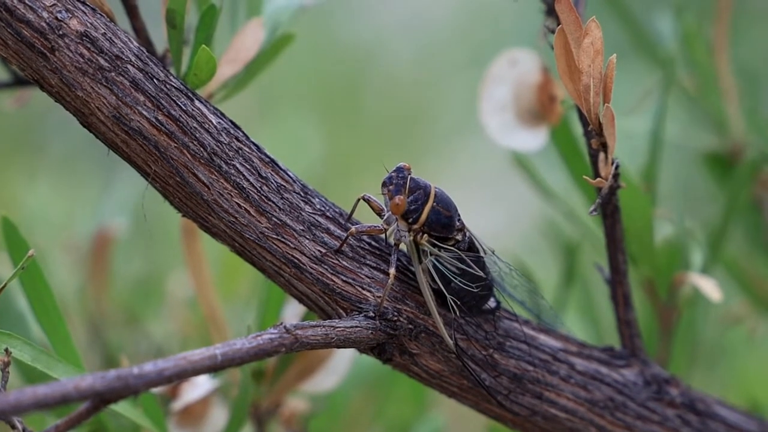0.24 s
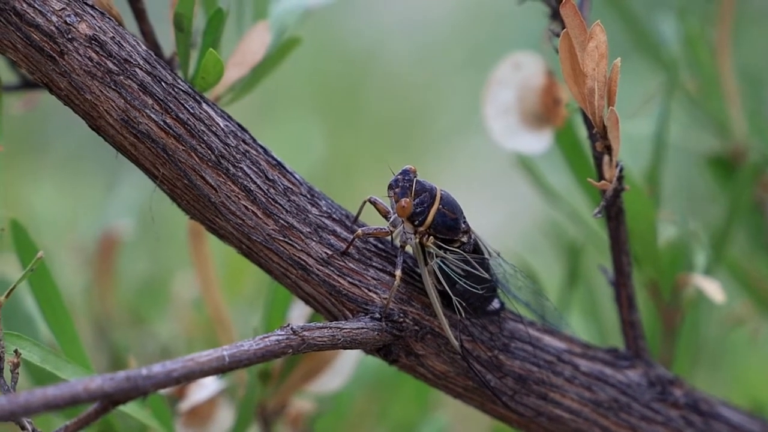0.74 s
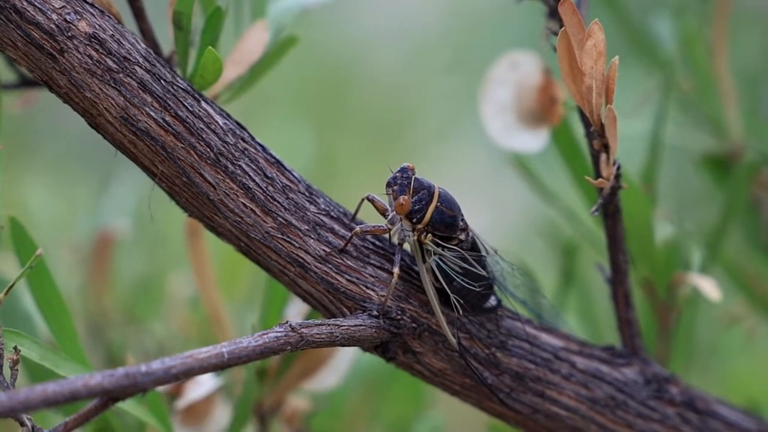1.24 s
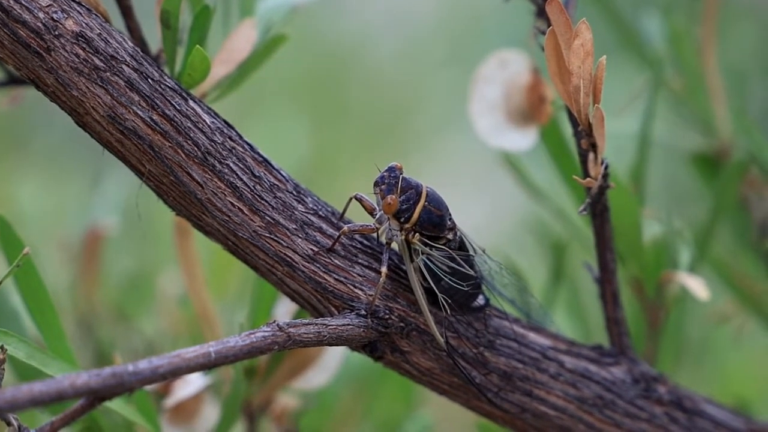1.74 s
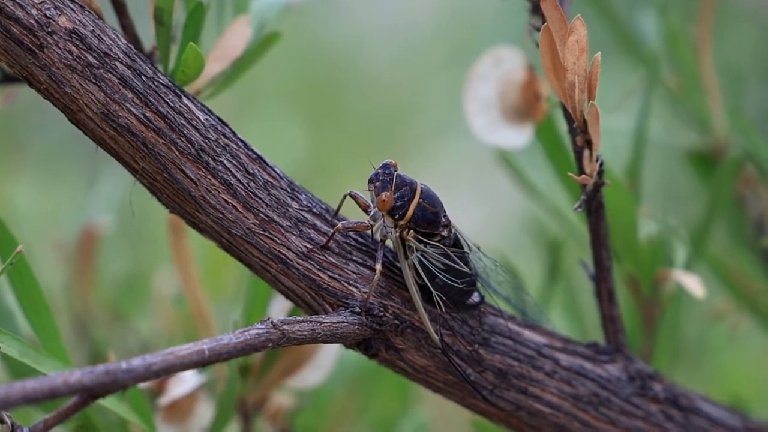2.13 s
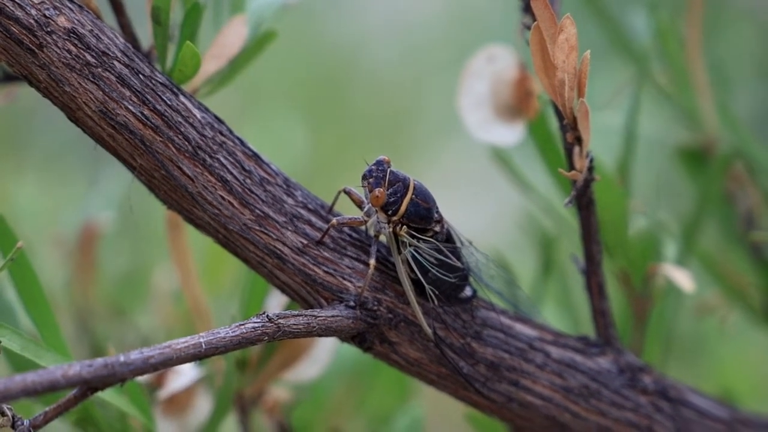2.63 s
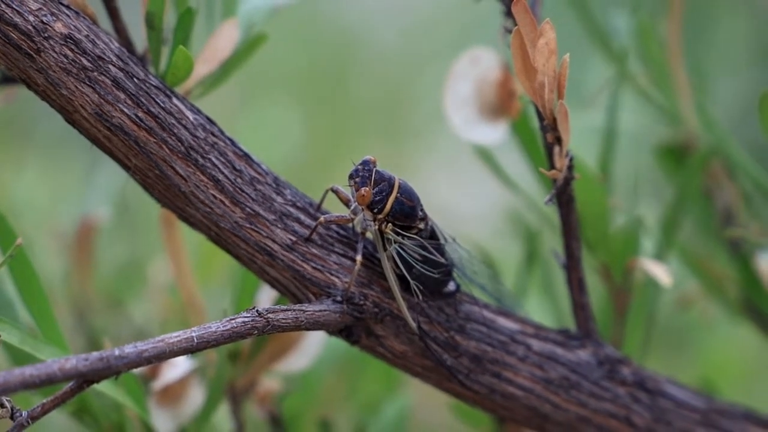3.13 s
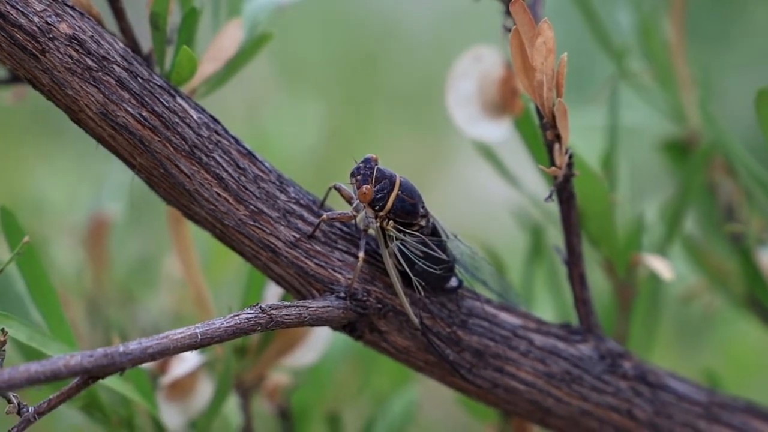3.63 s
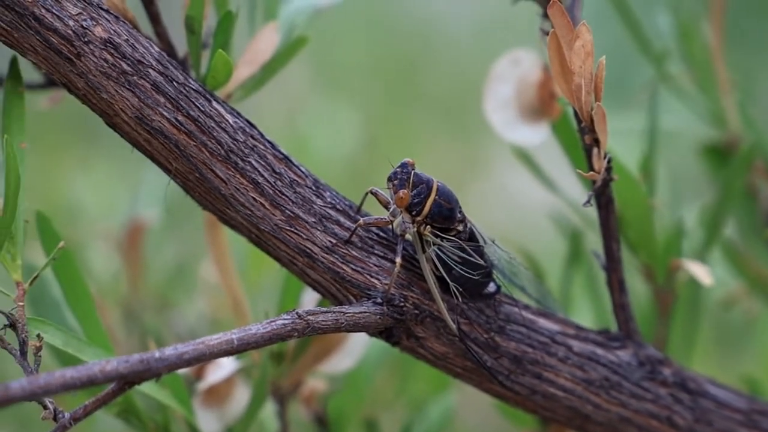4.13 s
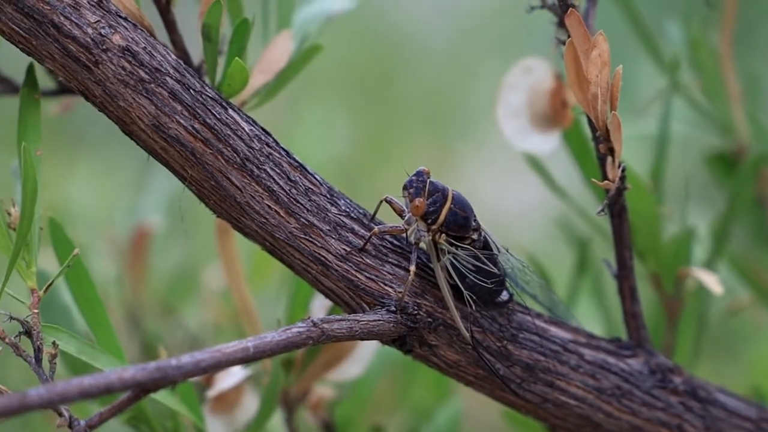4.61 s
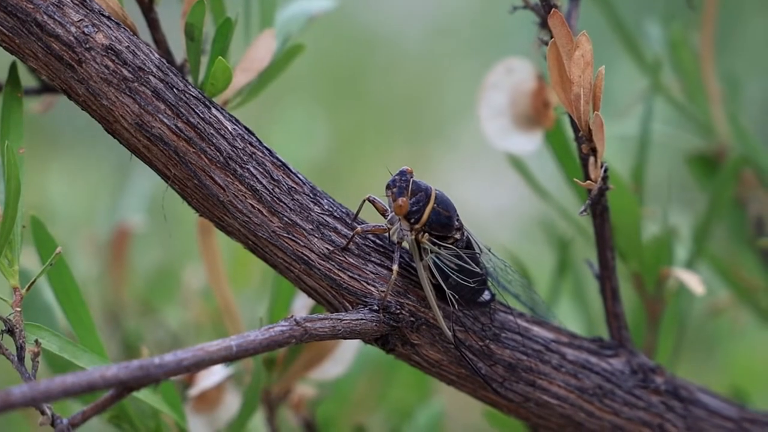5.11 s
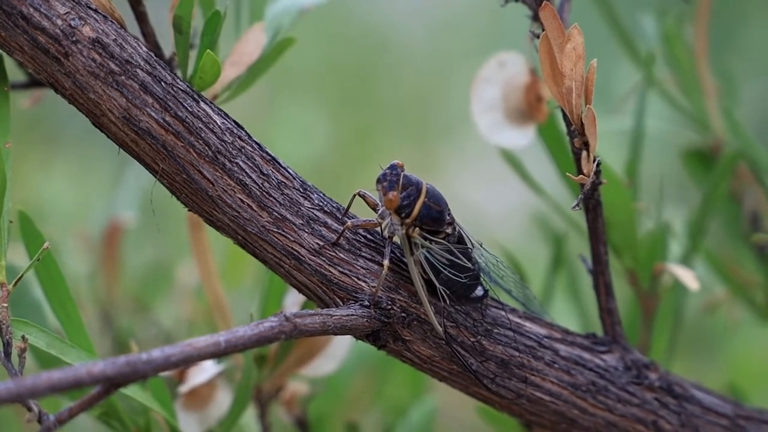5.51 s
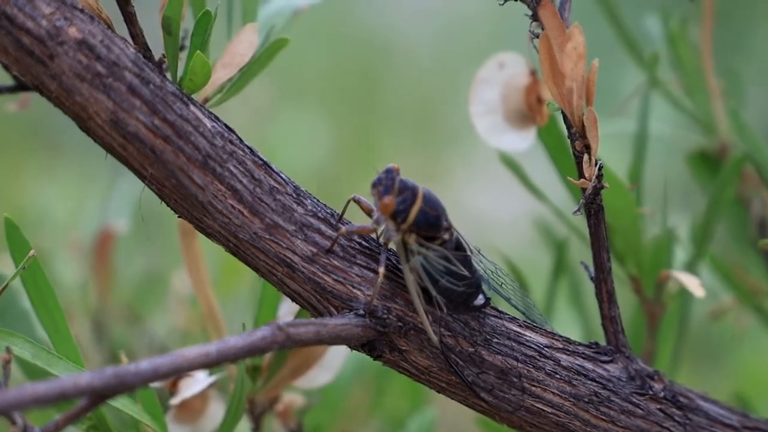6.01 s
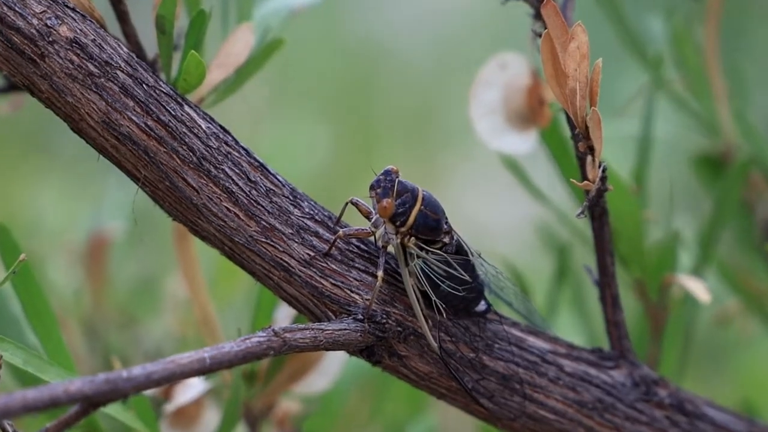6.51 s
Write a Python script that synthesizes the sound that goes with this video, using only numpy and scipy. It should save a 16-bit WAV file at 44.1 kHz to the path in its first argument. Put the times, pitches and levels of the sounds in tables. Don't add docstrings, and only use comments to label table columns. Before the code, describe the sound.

Close stereo pickup of two cicadas on leafy twigs. One holds a bright, shrill, steady buzz while the other ticks faintly underneath, faster and faster. The first breaks off, leaving a quiet dry rattle that turns into a buzz, tightening and swelling until it is loud at the end. A faint distant chorus and soft air lie behind.

```python
import sys
import numpy as np
from scipy import signal
from scipy.fft import rfft, irfft, next_fast_len
from scipy.io import wavfile
from scipy.ndimage import uniform_filter1d

SR = 44100
rng = np.random.default_rng(int(sys.argv[2]) if len(sys.argv) > 2 else 0)


def generate_wav(signal):
    frames = np.transpose(np.atleast_2d(signal))
    scaled = np.clip(frames, -1, 1) * 32767
    pcm = np.round(scaled).astype(np.int16)
    wavfile.write(sys.argv[1], SR, pcm)


def nominal_scale(level):
    x = np.asarray(level, float) / 20
    return 10 ** x


N = 297675

# pitch in Hz, width in Hz, left level in dB,
# right level in dB, lag of the left behind the right in ms.
SLACK_MODES = [(3180, 1400, -26.5, -30.5, 0.048), (5250, 170, -31, -8.5, 0.28), (6400, 950, -8, -7, 0.022),
               (6880, 2100, -4, 5, 0.024), (7730, 1420, 3, 3, 0.034), (9640, 430, -8.5, -9, 0.049),
               (12500, 730, -27, -11.5, 0.033), (15000, 820, -18, -26, 0.24)]
STEADY_DB = .6


def first_cicada():
    # time in seconds, strokes per second.
    stroke_rate = [(.0041, 157.42), (1, 157.49), (2.2, 157.16), (3.4, 157.39), (3.75, 157.21),
                   (3.95, 156.33), (4.42, 156.53), (4.6, 149.27)]
    # start in seconds, level in dB.
    last_strokes = [
        (4.6397, -30),
        (4.7314, -40),
        (4.8654, -42),
    ]
    # time in seconds, level of each of the four ribs in dB.
    rib_strength = [(0, -20, -14, -14, -26), (1.05, -20, -14, -16, -26), (1.3, -14, -20, -21, -24),
                    (3.1, -14, -19, -21, -24), (3.5, -15, -20, -14, -19), (4.6, -15, -20, -13, -19)]
    rib_wait_ms = [.85, 1.05, 1.35, 1.65]
    # delay in ms, level in dB.
    twig_echoes = [(2.1, -24), (3.0, -20), (3.4, -23), (4.1, -27), (5.55, -21)]
    # time in seconds, left minus right in dB.
    sway = [(0, 1), (2, 4.1), (3.6, 1.5), (4.1, 0.5), (4.55, 2.5), (4.6, 0)]
    steady_level_db, falter_db, falter_s = -27, -6, 4.551

    s = stroke_times(stroke_rate, jitter_ms=.027)
    level_db = steady_level_db + falter_db * (s > falter_s)
    level_db = level_db + rng.normal(0, STEADY_DB / 2, len(s))
    last_s, last_db = np.transpose(last_strokes)
    s, level_db = np.append(s, last_s), np.append(level_db, last_db)

    lead = body(first_body(s), s, nominal_scale(level_db), uneven_db=STEADY_DB)
    lead = with_echoes(lead, twig_echoes)

    rib_db = np.transpose(read(rib_strength, s))
    unsteady_ms = rng.normal(0, .025, rib_db.shape)
    rib_s = (s[:, None] + (rib_wait_ms + unsteady_ms) / 1000).ravel()
    rib_sizes = nominal_scale(level_db[:, None] + rib_db).ravel()
    rest = body(first_body(rib_s), rib_s, rib_sizes, uneven_db=1.8)

    pan_db = read(sway, np.arange(N) / SR)[0]
    song = nominal_scale(13.5) * (lead + rest) * nominal_scale([pan_db / 2, -pan_db / 2])
    return song, nominal_scale(-13.0) * push(s, nominal_scale(level_db), cut_hz=2330)


def first_body(s):
    # pitch in Hz, width in Hz, left level in dB, right level in dB, left lag in ms.
    first_modes = [(4640, 1860, -27.5, -19, 0.019), (7040, 230, -15.5, -3, -0.1),
                   (8643, 105, 1, -24, -0.037), (9104, 420, 1, 3.5, -0.033), (9910, 820, -28, 0.5, -0.056),
                   (10465, 112, -1, -3, 0.014), (10810, 370, -19, -2, -0.037),
                   (11940, 240, -16, -18, -0.14), (13930, 1500, -25, -20, 0.11)]
    climb_per_s, middle_s = .008, 2.3
    modes = np.repeat(np.array(first_modes)[..., None], len(s), axis=2)
    climbs = (modes[:, 0] > 10200) & (modes[:, 0] < 13000)
    modes[:, 0] *= 1 + climbs * climb_per_s * (s - middle_s)
    return modes


def second_cicada():
    # time in seconds, strokes per second.
    stroke_rate = [(4.6158, 143.31), (5, 149.69), (5.5, 152.56), (6.2, 156.74), (6.75, 156.41)]
    # time in seconds, first click in dB, body tension from 0 to 1.
    song_curve = [(4.63, -41, 0), (4.9, -39.5, 0), (5.33, -35.5, 0.13), (5.5, -33.5, 0.08),
                  (5.7, -31.5, 0.22), (5.85, -29.5, 0.63), (6.02, -27, 0.69), (6.06, -23.5, 0.73),
                  (6.6, -22.5, 0.95)]
    # start in seconds, other drum's delay in ms, other drum's level
    # in dB, swing of the first click above and below its mean in dB.
    gaits = np.array([
        (4.6, .72, -1, 0),
        (5.12, .83, -1.5, 0),
        (5.345, .3, -3, 0),
        (5.48, .3, -16, .2),
        (5.862, .365, -13, 2),
        (6.34, .45, -18, .2),
    ])
    # time in seconds, delay of each of the four ribs in ms.
    rib_delays = [(4.62, 2.25, 3.0, 3.55, 3.9), (5, 1.85, 2.7, 3.3, 3.65), (5.25, 1.7, 2.48, 3.2, 3.5),
                  (5.5, 1.45, 2.1, 2.68, 3.02), (5.8, 1.1, 1.66, 2.14, 2.6), (6.1, .9, 1.32, 1.81, 2.3),
                  (6.4, .8, 1.02, 1.68, 2.1), (6.75, .8, .98, 1.68, 2.16)]
    # time in seconds, level of each rib in dB.
    rib_levels = [(4.62, -2, -3, -4, -9), (5.3, -3, -4, -4, -9), (5.6, -5, -5, -5, -11),
                  (5.85, -4, -5, -5, -13), (5.87, -24, -5, -5, -13), (6.3, -26, -6, -6, -13),
                  (6.42, -28, -5, -5, -11), (6.75, -28, -6, -7, -10)]
    shove_levels = [0, -3, -3, -3, -3, -3]
    # pitch in Hz, width in Hz, left level in dB, right level in dB,
    # left lag in ms.
    taut_modes = [(5110, 190, -20.5, -15, 0.045), (6760, 220, -19, -8, 0.018),
                  (7150, 330, -24.5, -23, 0.0061), (8340, 740, 10, 9, 0.028), (9200, 170, -4.5, 1, 0.05),
                  (10290, 100, -32, -9, 0.03), (13030, 980, -31, -17, 0.1), (15260, 690, -28, -25, 0.033)]
    # delay in ms, level in dB.
    twig_echoes = [(.45, -19), (2.9, -27), (4.6, -30)]

    s = stroke_times(stroke_rate, jitter_ms=.023)
    level_db, taut = read(song_curve, s)
    since, other_ms, other_db, swing_db = gaits[np.searchsorted(gaits[:, 0], s) - 1].T
    alternate = (-1.) ** np.arange(1, len(s) + 1)
    swing = swing_db * np.exp(-((s - since) / .33) ** 2) * alternate

    delay_ms = np.column_stack([0 * s, other_ms, *read(rib_delays, s)])
    wobble_ms = np.interp(taut, [0, 1], [.028, .012])
    delay_ms[:, 1:] += rng.normal(0, 1, (len(s), 5)) * wobble_ms[:, None]
    snap_s = (s[:, None] + delay_ms / 1000).ravel()

    rib_db = np.transpose(read(rib_levels, s)) - swing[:, None]
    db = level_db[:, None] + np.column_stack([swing, other_db + 6.5 * swing, rib_db])
    db = db + rng.normal(0, STEADY_DB / 2, delay_ms.shape)

    taut = np.repeat(np.clip(taut, 0, 1), delay_ms.shape[1])
    modes = np.array(SLACK_MODES)[..., None] * (1 - taut) + np.array(taut_modes)[..., None] * taut
    taut_rib = taut ** 2 * np.tile([0, 0, 1, 1, 1, 1], len(s))
    modes[3, 2:4] += -4 * taut_rib
    modes[:, 1] *= 1 + 1.5 * taut_rib
    song = body(modes, snap_s, nominal_scale(db).ravel(), uneven_db=STEADY_DB)

    shove_db = db + 0.75 * level_db[:, None] + shove_levels
    shove = push(snap_s, nominal_scale(shove_db).ravel(), cut_hz=2370)
    return nominal_scale(16.0) * with_echoes(song, twig_echoes), nominal_scale(9.5) * shove


def ticks():
    slow_ticks = [.1067, .229, .362, .49, .6227, .7427, .86, .9686, 1.081, 1.1933, 1.352, 1.448, 1.575,
                  1.6888, 1.8188, 1.9415, 2.0582, 2.1537, 2.249, 2.357, 2.4588, 2.5745, 2.6948, 2.798,
                  2.8963, 2.9946, 3.076, 3.158, 3.2477, 3.3296]
    quick_ticks = [3.4127, 3.489, 3.584, 3.6616, 3.7123, 3.7328, 3.7831, 3.8027, 3.846, 3.8725, 3.8927,
                   3.9268, 3.9504, 3.977, 3.999, 4.0391, 4.07, 4.086, 4.107, 4.1244, 4.1435]
    # time in seconds, ticks per second.
    roll_rate = [(4.169, 46), (4.45, 50), (4.55, 72), (4.604, 72)]
    rib_shares = [.48, .69, .89, 1.]
    tick_db, sag_db_per_s, hurried_db, roll_db = -36, -0.95, -41, -40.5
    hurry_s, answer_from_s, answer_always_s = 3.7, 3.75, 4.5
    answer_ms, answer_db = 7.5, -2
    lag_ms, spread_ms = .9, 4.6

    roll = stroke_times(roll_rate, jitter_ms=2.5)
    s = np.concatenate([slow_ticks, quick_ticks, roll])
    db = np.select([s < hurry_s, s < roll[0]], [tick_db + sag_db_per_s * s, hurried_db], roll_db)
    answered = rng.random(len(s)) < (s - answer_from_s) / (answer_always_s - answer_from_s)
    s, db = np.append(s, s[answered] + answer_ms / 1000), np.append(db, db[answered] + answer_db)
    db = db + STEADY_DB * rng.normal(0, 1, len(s))

    chance = rng.normal(0, 1, (len(s), 10))
    delay_ms = lag_ms + spread_ms * np.array([0, .15] + rib_shares[:3]) + 0.27 * chance[:, :5]
    sizes = nominal_scale(db[:, None] + np.array([-0.5, 3, -7.0, -2.5, -1.5]) + 0.17 * chance[:, 5:])
    snap_s = (s[:, None] + delay_ms / 1000).ravel()
    sound = body(SLACK_MODES, snap_s, sizes.ravel(), uneven_db=3.0)
    return nominal_scale(13.5) * passed(sound, 2, 8000)


def body(modes, s, sizes, uneven_db):
    rise_ms, length = 0.39, 140
    out = np.zeros((2, N + length))
    at = np.clip(np.ceil(s * SR) - 4, 0, N).astype(int)[:, None] + np.arange(length)
    t = np.maximum((at + 4) / SR - s[:, None], 0)
    rise = np.sin(np.pi / 2 * np.minimum(1000 * t / rise_ms, 1)) ** 2
    for hz, width, left_db, right_db, lag_ms in np.reshape(modes, (len(modes), 5, -1, 1)):
        force = sizes * nominal_scale(rng.normal(0, uneven_db, len(s)))
        ring = force[:, None] * width / 1000 * rise * np.exp(-np.pi * width * t)
        for side, (db, lag) in enumerate([(left_db, lag_ms), (right_db, -lag_ms)]):
            wave = nominal_scale(db) * ring * np.sin(2 * np.pi * hz * (t - lag / 2000))
            out[side] += np.bincount(at.ravel(), wave.ravel(), N + length)
    return out[:, :N]


def push(s, sizes, cut_hz):
    return passed(clicks(s, sizes), 2, cut_hz)


def with_echoes(x, echoes):
    ms, db = np.transpose(echoes)
    taps = clicks(np.append(0, ms) / 1000 + 6 / SR, nominal_scale(np.append(0, db)))[:300]
    return signal.fftconvolve(x, taps[None], axes=1)[:, 6:N + 6]


def leaves(x):
    t = np.arange(int(.12 * SR)) / SR
    fade = nominal_scale(-60 * t / .045) * np.minimum(t / 0.0035, 1)
    scatter = rng.standard_normal((2, len(t))) * fade
    scatter = scatter / np.linalg.norm(scatter, axis=1, keepdims=True)
    return nominal_scale(-21.5) * signal.fftconvolve(x, scatter, axes=1)[:, :N]


def far_sounds():
    # pitch in Hz, level in dB per Hz.
    chorus_colour = [(3000, -36.5), (4500, -25), (6000, -13.5), (8000, 1.5), (9500, -6), (11000, -10),
                     (13000, -17), (16000, -23.5)]
    # time in seconds, level in dB.
    drone_passes = [
        (.63, -70),
        (1.65, -63.5),
        (3.2, -66.5),
        (4.45, -62.5),
        (4.8, -67),
    ]
    rise_db_per_s, fall_db_per_s = 20.5, 19
    call_s, call_length_s, call_db, call_hz, lift_hz = 5.115, 0.096, -75, 584, 119

    t = np.arange(N) / SR
    near_db = [db - np.where(t < s, rise_db_per_s * (s - t), fall_db_per_s * (t - s)) for s, db in drone_passes]
    drone_colour = [(150, -33), (260, -13.0), (330, -9.5), (420, -19.0), (600, -34.5)]
    drone = noise(drone_colour, alike=0.85) * nominal_scale(np.max(near_db, axis=0) - 10.0)

    swell = np.exp(-(2 * (t - call_s) / call_length_s) ** 2)
    call = nominal_scale(call_db) * swell * np.sin(2 * np.pi * np.cumsum(call_hz + lift_hz * swell) / SR)
    return nominal_scale(-46) * noise(chorus_colour, alike=0.038) + drone + call


def air(song):
    # pitch in Hz, level in dB per Hz.
    air_colour = [(20, -23), (45, -2), (110, -1.5), (380, -4.5), (800, -4.5), (1600, -9.5), (3000, -5.5),
                  (5000, -13.5)]
    air_db, strain_from_db, strain_slope = -73.5, -30, 2.19
    loud_db = 10 * np.log10(uniform_filter1d(np.mean(song ** 2, axis=0), size=6000) + 1e-12)
    level_db = air_db + strain_slope * np.maximum(loud_db - strain_from_db, 0)
    return nominal_scale(level_db) * noise(air_colour, alike=0.56)


def noise(spectrum, alike):
    pitches = np.fft.rfftfreq(next_fast_len(N + 8192), 1 / SR)
    hz, db = np.transpose(spectrum)
    colour = nominal_scale(np.interp(np.log(pitches + 1), np.log(hz), db))
    white = rng.standard_normal((2, 2 * len(pitches) - 2))
    mid, side = irfft(rfft(white) * colour)[:, :N]
    alike = np.clip(alike, 0, 1)
    return rms_one(np.sqrt(1 + alike) * mid + np.sqrt(1 - alike) * side * [[1], [-1]])


def stroke_times(rate, jitter_ms):
    t = np.arange(rate[0][0], rate[-1][0], 1e-4)
    done = np.cumsum(read(rate, t)[0]) * 1e-4
    s = np.interp(np.arange(int(done[-1] - done[0]) + 1), done - done[0], t)
    return s + rng.normal(0, jitter_ms / 1000, len(s))


def clicks(s, sizes):
    taps = np.floor(s * SR)[..., None] + np.arange(-5, 7)
    off = taps - s[..., None] * SR
    pulse = sizes[..., None] * np.sinc(off) * np.cos(np.pi * off / 12) ** 2
    return np.bincount(np.clip(taps, 0, N).astype(int).ravel(), pulse.ravel(), N + 1)[:N]


def read(rows, s):
    at, *columns = np.transpose(rows)
    return [np.interp(s, at, c) for c in columns]


def rms_one(x):
    return x / np.sqrt(np.mean(x ** 2) + 1e-20)


def passed(x, order, hz, kind="low"):
    return signal.sosfilt(signal.butter(order, hz, kind, fs=SR, output="sos"), x)


def scene():
    first, first_push = first_cicada()
    second, second_push = second_cicada()
    first = passed(first, 3, 6000, "high")
    second = passed(second, 2, 2300, "high") + passed(ticks(), 3, 3300, "high")
    song = first + second
    return song + leaves(song) + first_push + second_push + air(song) + far_sounds()


def band_limit(x):
    return signal.sosfilt(signal.butter(12, 16610, fs=SR, output="sos"), x)


def record(dry):
    overload = .3
    thump = passed(dry ** 2, 2, 240)
    thump = passed(thump.mean(axis=0), 2, 110, "high")
    rounded = overload * np.tanh(dry / overload)
    rounded = signal.sosfilt(signal.cheby2(18, 40, 15900, fs=SR, output="sos"), rounded)
    return band_limit(rounded + nominal_scale(-35.0) * thump)


dry = scene()
out = record(dry)
generate_wav(out)
```